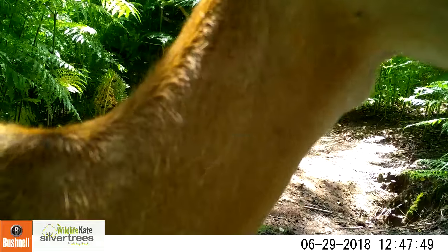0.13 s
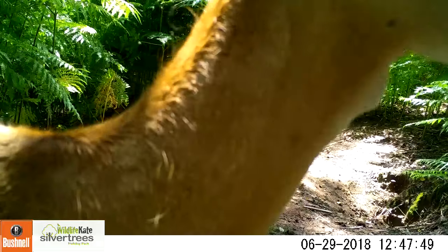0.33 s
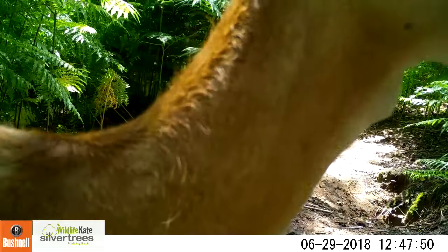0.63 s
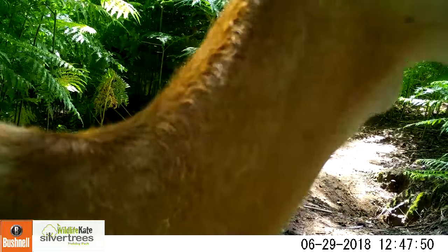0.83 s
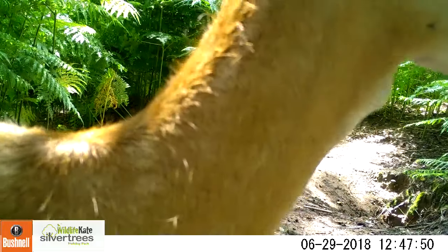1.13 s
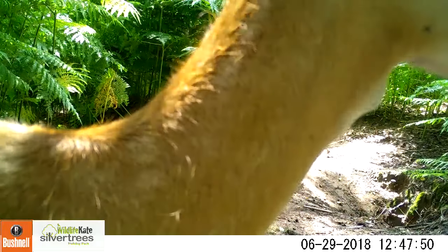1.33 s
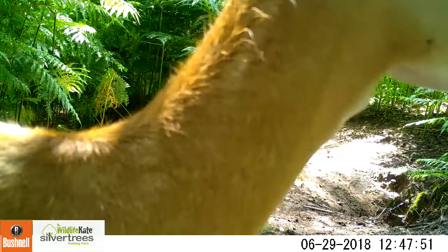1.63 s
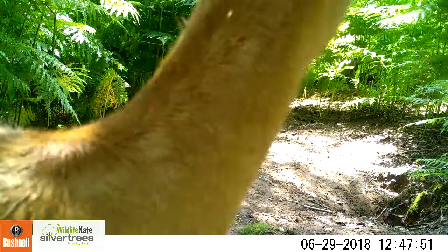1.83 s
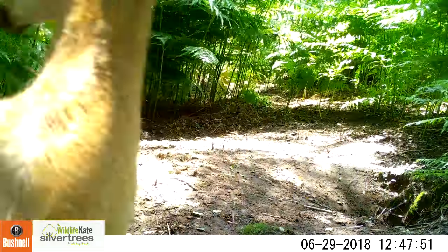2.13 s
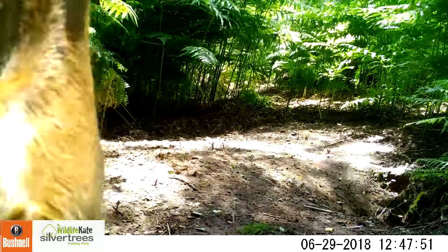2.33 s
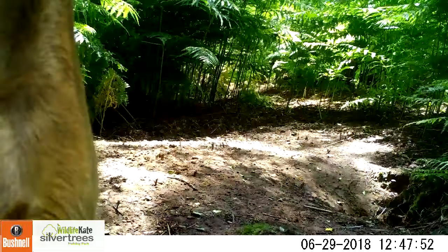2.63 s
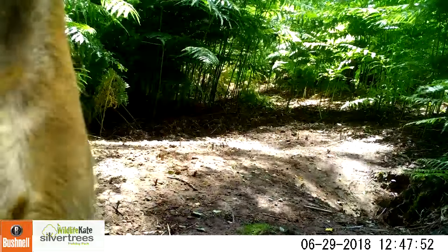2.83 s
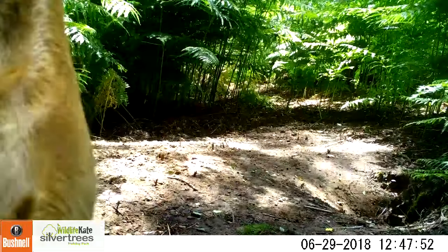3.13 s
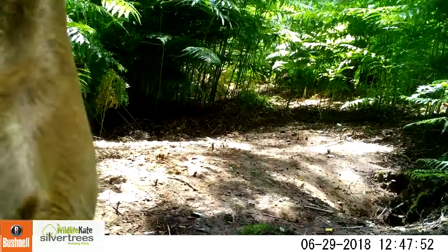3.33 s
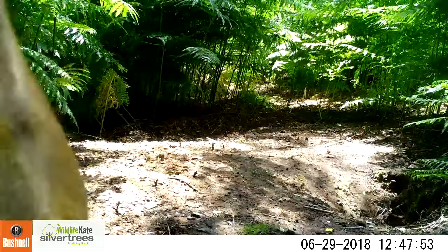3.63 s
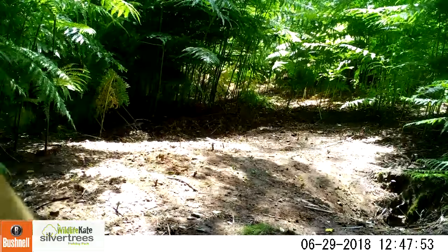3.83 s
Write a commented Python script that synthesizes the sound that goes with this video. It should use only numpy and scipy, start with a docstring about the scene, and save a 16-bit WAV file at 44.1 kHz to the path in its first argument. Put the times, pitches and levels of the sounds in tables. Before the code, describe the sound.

A deer very close to a small outdoor microphone squeaks loudly twice, about a second apart, each call dropping in pitch and distorting slightly; low wind thumps, faint twig ticks and steady woodland hiss surround it.

```python
"""A quiet wood, with a small outdoor camera's microphone right beside a deer that squeaks twice.
Each squeak falls in pitch: vocal-fold harmonics, with a hummed fundamental and four moving mouth
resonances, loud enough to overload the recorder. Two fainter squeaks, short bright twig ticks and
faint wavering tones from far off lie around it. Shaped noise makes the wind that thumps on the
microphone, its lumpy rumble and the hiss of the wood."""
import sys
import numpy as np
from scipy import signal
from scipy.io import wavfile
from scipy.ndimage import uniform_filter1d

SR = 44100
rng = np.random.default_rng(int(sys.argv[2]) if len(sys.argv) > 2 else 0)


def field_ratio(decibels):
    """Amplitude ratio for a level in dB (20 dB per decade); scalars and array-likes work."""
    return 10 ** (np.asarray(decibels, dtype=float) / 20)


def wav_out(sig):
    """Save sig, one row per channel (or a flat mono array), as 16-bit PCM at SR to the path in sys.argv[1]."""
    wavfile.write(sys.argv[1], SR, np.round(np.clip(np.atleast_2d(sig).T, -1, 1) * 32767).astype(np.int16))


N = 176400

# The two close calls, as tracks of voice and mouth:
# (time [s], pitch [Hz], hum level [dB], third harmonic level [dB],
#  then frequency [Hz], level [dB] of each of four mouth resonances, low to high)
FIRST_CALL = [(2.548, 714, -39, -60, 2380, -50, 3380, -48, 4360, -46, 5930, -51),
              (2.557, 730.7, -27, -36, 2500, -37, 3060, -29.5, 4400, -38, 6000, -43),
              (2.576, 654, -43.5, -37, 2500, -26.5, 3540, -19, 4740, -32, 5580, -25),
              (2.604, 567.6, -28, -33, 2350, -37, 3150, -24, 4420, -21.5, 6050, -41),
              (2.611, 533, -21, -40, 2200, -36, 3860, -24, 5160, -21, 6300, -46),
              (2.619, 482, -17.5, -52, 2040, -45, 2900, -29, 3960, -25, 5570, -44),
              (2.631, 462.5, -23.5, -44, 1930, -47, 2940, -39, 4330, -38, 5630, -54),
              (2.652, 455.5, -21, -41, 1870, -63, 2960, -37.5, 4430, -41, 6120, -63),
              (2.665, 460.6, -18.5, -46, 2110, -17.5, 2980, -20.5, 3410, -19.5, 4900, -30),
              (2.686, 462, -17.5, -32, 1830, -24, 2910, -14.5, 4650, -22.5, 6100, -31),
              (2.712, 468.2, -19, -47, 1850, -24, 3080, -24, 4470, -13, 6250, -31.5),
              (2.726, 460, -19.5, -35, 1870, -22, 3060, -28, 4400, -22, 5900, -24),
              (2.75, 409, -18.5, -50, 1780, -24.5, 3420, -22, 4780, -27, 5860, -43),
              (2.765, 368.6, -29.5, -54, 1780, -45, 3220, -36, 4570, -34, 5980, -48),
              (2.773, 410, -20, -56, 1713, -62, 3420, -49, 4680, -51, 5980, -58),
              (2.79, 471, -54, -77, 1710, -63, 3360, -51, 4670, -49, 5950, -55)]
SECOND_CALL = [(3.583, 669, -36, -32, 2000, -27, 3220, -36, 4800, -41, 5640, -47),
               (3.592, 623, -43, -43, 2300, -31, 3120, -30.5, 4700, -32, 5600, -38),
               (3.608, 609, -35, -37, 2400, -51, 3300, -24, 4560, -27, 5600, -39),
               (3.621, 538, -27.5, -40, 2390, -33, 3170, -23.5, 4290, -38, 5640, -38),
               (3.633, 524, -21.5, -45, 2470, -44, 3220, -40, 4200, -36, 5980, -51),
               (3.645, 477, -17.5, -35, 2340, -12, 3060, -19, 4220, -17, 6110, -22),
               (3.657, 469.6, -14.5, -33, 2560, -14.5, 3160, -8.5, 4270, -16.5, 6150, -34),
               (3.674, 468.6, -10.5, -23, 2270, -15, 2950, -10, 4040, -19, 6100, -22),
               (3.685, 466.4, -13.5, -21, 2290, -12, 2810, -11.5, 3800, -11.5, 5960, -25),
               (3.699, 464.3, -12.5, -22, 2290, -13, 2970, -18, 3730, -14.5, 6000, -29),
               (3.717, 466, -18, -22, 2290, -11.5, 3540, -15.5, 4900, -25, 6500, -30),
               (3.747, 470.7, -21, -27.5, 2200, -25, 3380, -13, 5040, -18.5, 6660, -36),
               (3.78, 458.5, -20.5, -40, 1860, -37, 3250, -18, 5000, -40, 6160, -31),
               (3.798, 419.4, -20.5, -40, 1800, -27.5, 3020, -19.5, 4800, -39, 6000, -35.5),
               (3.825, 364, -30.5, -47, 1755, -38, 2966, -60, 4430, -39, 6060, -41),
               (3.845, 444.6, -33, -58, 1834, -58, 3030, -51, 4600, -52, 6080, -58)]
# Widths of the four mouth resonances: (width [Hz])
MOUTH_WIDTHS_HZ = [574, 684, 840, 1500]
# Weak resonances above the mouth's four: (frequency [Hz], width [Hz], level against the fourth [dB])
TOP_RESONANCES = [(8300, 2300, -16), (11000, 1900, -23.5)]
# The mouth snaps open once in each call: (time [s])
MOUTH_OPENINGS = [2.6606, 3.6453]
# The voice breaks as the folds beat unevenly:
# (time [s], half length [s], rasp level on the eighth harmonic [dB], sag of the upper harmonics [dB])
VOICE_BREAKS = [(2.609, .009, -3, -3), (2.674, .015, -3, -1), (2.733, .004, -4, -7), (3.614, .004, -4, -9),
                (3.641, .006, 0, -1), (3.785, .005, -3, -8), (3.812, .012, -8, -6)]
# Faint squeaks:
# (start [s], length [s], level [dB], start pitch [Hz], end pitch [Hz], bright resonance [Hz])
SQUEAKS = [(1.415, .075, -50, 815, 755, 4500), (3.197, .12, -47, 850, 745, 4000)]
# Harmonics of a faint squeak, first to sixth, before the bright resonance is added: (level [dB])
SQUEAK_HARMONICS_DB = [0, -2, -5, -4, -14, -14]
# Twig ticks: (time [s], peak level [dB], frequency [Hz])
TICKS = [(0.4244, -36, 9900), (1.827, -22, 9300), (3.79, -28, 10500), (3.8219, -37, 12960),
         (3.9214, -27.5, 11000)]
# Tones from far away: (start [s], length [s], level [dB], frequency [Hz])
FAR_TONES = [(.76, .26, -48, 805), (.88, .18, -49.5, 895), (2.75, .6, -44, 178), (3.55, .4, -43, 178)]
# Gusts on the microphone: (time [s], level [dB])
GUSTS = [(0.2, -33), (0.57, -30.5), (0.86, -17), (1.04, -36.5), (1.18, -20.5), (1.41, -33), (1.66, -22.5),
         (1.7, -30), (2.13, -23.5), (2.17, -29), (2.27, -16), (2.54, -32.5), (3.46, -33), (3.62, -17.5),
         (3.68, -30), (3.7, -19.5), (4.0, -31)]
# Relative spectra of wind thumps, rumble and hiss: (frequency [Hz], level [dB per Hz])
THUMP_SPECTRUM = [(7.1, -33.5), (43, 5.5), (53, -2.5), (86, -17.5), (223, -30), (550, -120)]
RUMBLE_SPECTRUM = [(29, -19), (65, 6.5), (113, -5.5), (178, -8), (300, -21), (660, -120)]
HISS_SPECTRUM = [(88, -10.5), (150, -0.5), (270, -5.5), (589, -11.5), (923, -16), (2920, -27), (4700, -18),
                 (5790, -21.5), (8070, -33.5), (15100, -43.5)]


def call(table, open_s):
    """Close squeak: vocal-fold harmonics, coloured by mouth resonances, with flutter, air and rasp."""
    wobble, flick, flick_s = .0012, .3, .02  # pitch jitter share; final upward flick: share, length [s]
    second_db = -10.5  # second harmonic against the hum
    snap_s, snap_time_s = 0.013, 0.00085  # span of movement that the snap skips, time scale of the snap
    flutter_db, air_db = -13, -28  # slow flutter on the sixth harmonic, air noise on the mouth tones
    spread = 0.111  # phase lag that softens each pulse [radians per harmonic squared]

    rows = np.transpose(table)
    t = np.arange(rows[0, 0], rows[0, -1], 1 / SR)
    hz, hum_db, third_db = [np.interp(t, rows[0], row) for row in rows[1:4]]

    # near the opening the mouth lingers before the snap, then jumps past it
    snap = open_s + snap_s / 2 * np.tanh((t - open_s) / snap_time_s)
    mouth_time = np.where(abs(t - open_s) < snap_s / 2, snap, t)
    mouth = [np.interp(mouth_time, rows[0], row) for row in rows[4:]]

    # the pitch flicks up as the folds let go
    jitter = evened(uniform_filter1d(rng.standard_normal(len(t)), size=200))
    letting_go = np.clip(1 - (t[-1] - t) / flick_s, 0, 1)
    hz = hz * (1 + wobble * jitter + flick * letting_go)

    # neighbouring mouth resonances have opposite sign
    k = np.arange(1, 27)[:, None]  # harmonic numbers
    weight = 0
    for n, (centre, db, width) in enumerate(zip(mouth[::2], mouth[1::2], MOUTH_WIDTHS_HZ)):
        weight = weight + (-1) ** n * field_ratio(db) * peak(k * hz, centre, width)
    for centre, width, db in TOP_RESONANCES:
        weight = weight + field_ratio(mouth[-1] + db) * peak(k * hz, centre, width)

    # slow flutter and faster air noise, both as complex random gains
    chance = rng.standard_normal(weight.shape) + 1j * rng.standard_normal(weight.shape)
    flutter = uniform_filter1d(uniform_filter1d(chance, size=250, axis=1), size=250, axis=1)
    flutter = field_ratio(flutter_db) * k / 6 * flutter / flutter.std()
    air = uniform_filter1d(chance[::-1], size=110, axis=1)
    air = air / air.std()

    # rasp grows with harmonic number and appears while the voice breaks
    s, half_s, rasp_db, sag_db = np.transpose(VOICE_BREAKS)[:, :, None]
    broken = np.exp(-((t - s) / half_s) ** 2)
    rasp = field_ratio(air_db) + np.minimum(k / 8, 1.6) ** 2 * (field_ratio(rasp_db) * broken).sum(0)
    weight = weight * (1 + flutter + rasp * air)
    weight = weight * field_ratio((sag_db * broken).sum(0)) / np.sqrt(1 + rasp ** 2)

    # the lowest three harmonics follow their own steady tracks
    weight[:3] = field_ratio(np.array([hum_db, hum_db + second_db, third_db]))
    phase = 2 * np.pi * k * np.cumsum(hz) / SR + spread * k ** 2
    tones = np.sqrt(2) * (weight * np.exp(1j * phase)).real.sum(0)
    fade = np.clip(np.minimum(t - t[0], t[-1] - t) / 0.0019, 0, 1)
    return t[0], tones * fade


def peak(hz, centre_hz, width_hz):
    """Response of a steep resonance on the harmonics, total power 1."""
    shape = 1 / (1 + 2j * (hz - centre_hz) / width_hz) ** 3
    return shape / np.sqrt((abs(shape) ** 2).sum(0))


def squeak(start, length, db, start_hz, end_hz, bright_hz):
    """Thin squeak: six harmonics whose pitch sinks as they fade, with one bright resonance."""
    fade_db, flicker_db = -8, 3  # level change from start to end, random flicker of each harmonic
    u = np.arange(0, length, 1 / SR) / length  # share of the squeak gone by
    hz = end_hz + (start_hz - end_hz) * (1 - u) ** 2
    k = np.arange(len(SQUEAK_HARMONICS_DB))[:, None] + 1
    weight = field_ratio(np.array(SQUEAK_HARMONICS_DB))[:, None] + abs(peak(k * hz, bright_hz, 600))
    flicker = evened(uniform_filter1d(rng.standard_normal(weight.shape), size=500, axis=1))
    weight = weight * field_ratio(flicker_db * flicker)
    tones = np.sqrt(2) * (weight * np.sin(2 * np.pi * k * np.cumsum(hz) / SR)).sum(0)
    edges = np.minimum(u * 20, 1) * np.minimum((1 - u) * 10, 1)
    return start, field_ratio(db + fade_db * u) * edges * tones


def trees(x):
    """Short diffuse echo from the trunks: the sound convolved with decaying noise."""
    t60_s, first_s = .12, .008  # time to fall 60 dB, delay before the echo
    t = np.arange(SR // 2) / SR
    tail = rng.standard_normal(len(t)) * field_ratio(-60 * t / t60_s) * (t > first_s)
    return signal.fftconvolve(x, tail / np.linalg.norm(tail))[:N]


def tick(s, db, hz):
    """Dry twig tick: a very short bright ring that swells and dies at once."""
    width_hz = 3800
    t = np.arange(0, .004, 1 / SR)
    rise = np.pi * width_hz * t
    envelope = np.e * rise * np.exp(-rise)  # peaks at 1
    return s, field_ratio(db) * envelope * np.sin(2 * np.pi * hz * t)


def far_tone(start, length, db, hz):
    """Faint tone from far away: a sine whose pitch and level waver at random."""
    t = np.arange(0, length, 1 / SR)
    drift, waver = evened(uniform_filter1d(rng.standard_normal((2, len(t))), size=1500, axis=1))
    arch = np.sin(np.pi * t / length) ** .5
    phase = 2 * np.pi * np.cumsum(hz * (1 + .008 * drift)) / SR
    return start, field_ratio(db + 3 * waver) * arch * np.sin(phase)


def wind():
    """Wind on the microphone: low thumps that follow the gusts, over a steady lumpy rumble."""
    rumble_db = -36.5 + 1.0
    s, db = np.transpose(GUSTS)
    gust = field_ratio(np.interp(np.arange(N) / SR, s, db))
    thumps = noise(THUMP_SPECTRUM, size=4096, patch_db=0, swell_db=0)
    # evens out the noise's own swings, so that the gusts set the level
    thumps = thumps / np.sqrt(uniform_filter1d(thumps ** 2, size=3000) + .08)
    rumble = field_ratio(rumble_db) * noise(RUMBLE_SPECTRUM, size=1024, patch_db=-1.0, swell_db=2.5)
    return gust * thumps + rumble


def hiss():
    """Hiss of the quiet wood: steady shaped noise with slight patches and flicker."""
    return field_ratio(-36.5) * noise(HISS_SPECTRUM, size=1024, patch_db=1.0, swell_db=.4)


def noise(points, size, patch_db, swell_db):
    """Noise of rms 1 from random short-time spectra, with patches and a flicker shared by all bands."""
    frames, hz = 4 * N // size + 5, np.fft.rfftfreq(size, 1 / SR)
    a, b, patches = rng.standard_normal((frames, len(hz), 3)).T
    patches = evened(uniform_filter1d(uniform_filter1d(patches, size=12, axis=0), size=8, axis=1))
    swell = evened(uniform_filter1d(rng.standard_normal(frames), size=6))
    level_db = read(points, hz)[:, None] + patch_db * patches + swell_db * swell
    spectra = (a + 1j * b) * field_ratio(level_db)
    return evened(signal.istft(spectra, nperseg=size, noverlap=3 * size // 4)[1][:N])


def read(points, hz):
    """Reads a spectrum on a log-frequency axis."""
    f, value = np.transpose(points)
    return np.interp(np.log(hz + 1), np.log(f + 1), value)


def evened(x):
    """Scales to rms 1."""
    return x / np.sqrt(np.mean(x ** 2) + 1e-20)


def add(mix, s, sound):
    """Adds a sound at a time in seconds."""
    part = mix[round(s * SR):][:len(sound)]
    part += sound[:len(part)]


def scene():
    """Close deer with its echo from the trees, then twigs, far tones, wind and hiss."""
    echo_db = -30
    deer, around = np.zeros(N), np.zeros(N)
    for table, opening in zip((FIRST_CALL, SECOND_CALL), MOUTH_OPENINGS):
        add(deer, *call(table, opening))
    for row in SQUEAKS:
        add(deer, *squeak(*row))
    for row in TICKS:
        add(around, *tick(*row))
    for row in FAR_TONES:
        add(around, *far_tone(*row))
    return (deer + field_ratio(echo_db) * trees(deer) + around + wind() + hiss())[None]


def low_pass(x):
    """Removes everything above the highest recorded frequency."""
    return signal.sosfilt(signal.butter(12, 16670, fs=SR, output="sos"), x)


def record(dry):
    """Microphone and recorder: late switch-on, settling offset, bent peaks, ceiling and band limit."""
    start_s, offset, settle_s = .0595, -0.22, 0.1  # switch-on; its voltage step and settling time
    bend = 0.37  # lopsided distortion of the small microphone
    ceiling, knee = .52, 16  # overload level, sharpness of the bend into it
    t = np.arange(N) / SR - start_s
    switch = np.clip(t * 4000, 0, 1)  # silent before switch-on
    x = switch * (dry - bend * dry ** 2 + offset * np.exp(-abs(t) / settle_s))
    x = x / (1 + abs(x / ceiling) ** knee) ** (1 / knee)
    band = signal.firwin(511, 15700, window=("kaiser", 8), fs=SR)  # low-pass edge in Hz
    mix = signal.oaconvolve(x, band[None], "same")
    return low_pass(mix)


dry = scene()
out = record(dry)
wav_out(out)
```